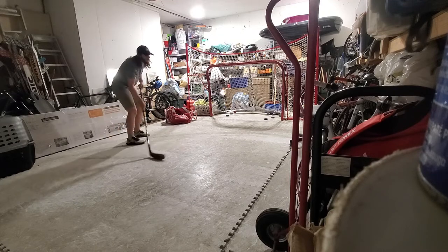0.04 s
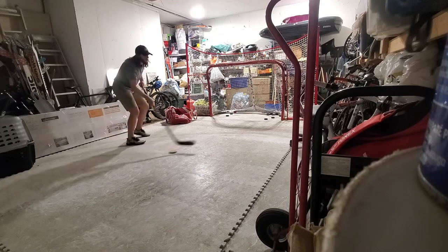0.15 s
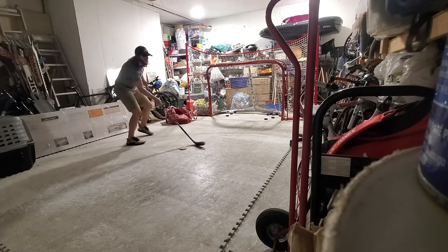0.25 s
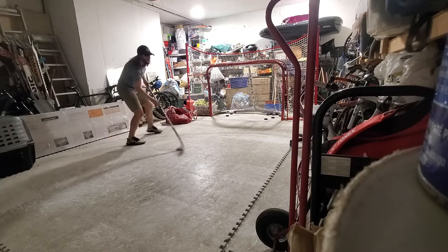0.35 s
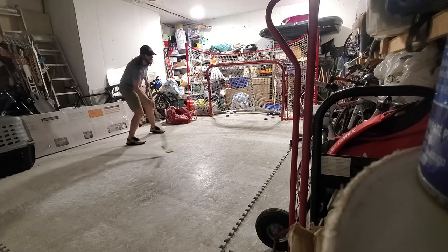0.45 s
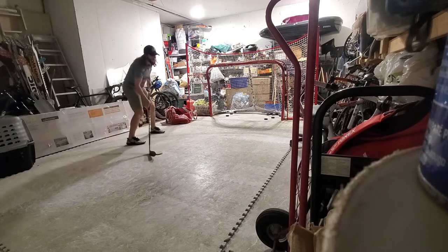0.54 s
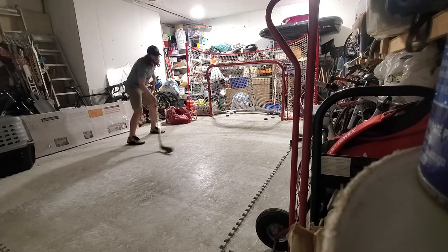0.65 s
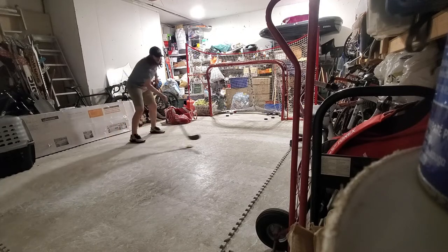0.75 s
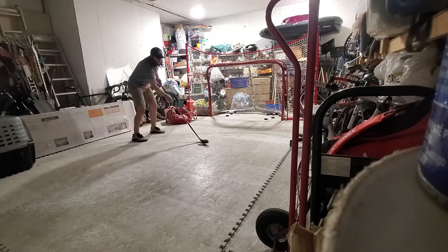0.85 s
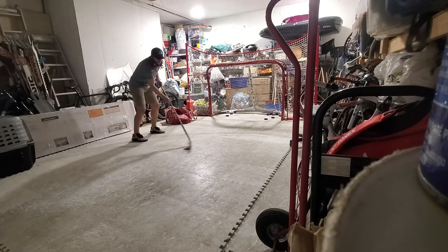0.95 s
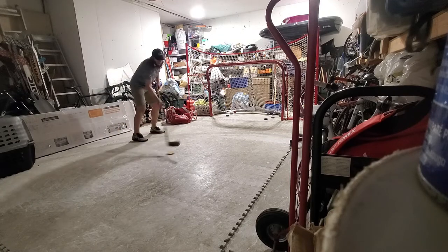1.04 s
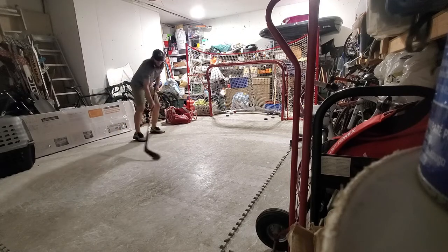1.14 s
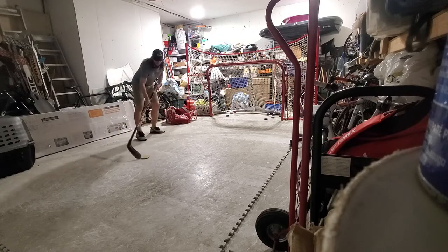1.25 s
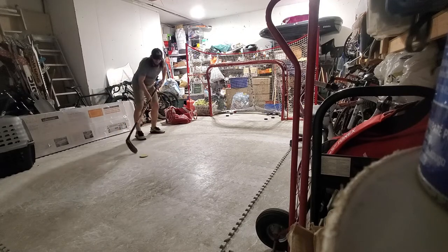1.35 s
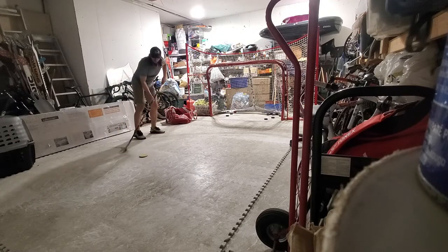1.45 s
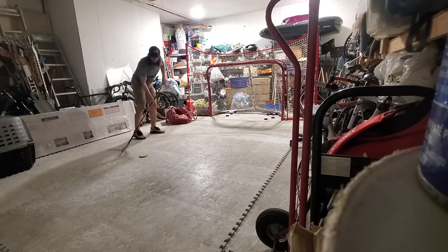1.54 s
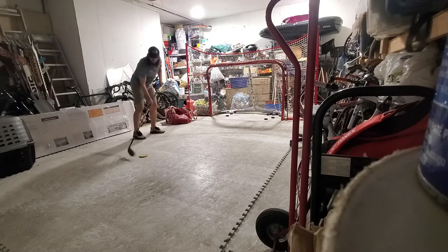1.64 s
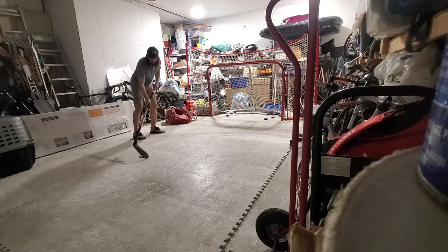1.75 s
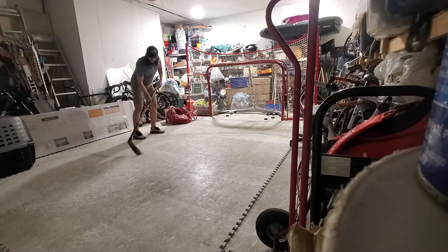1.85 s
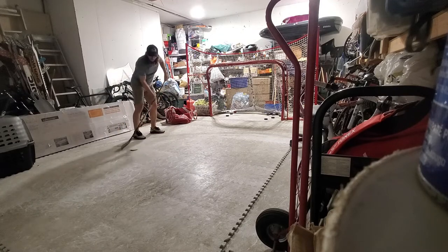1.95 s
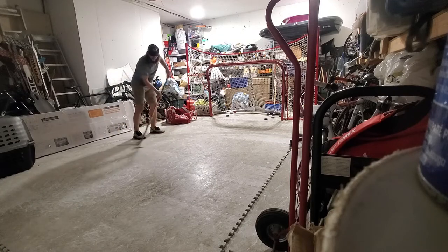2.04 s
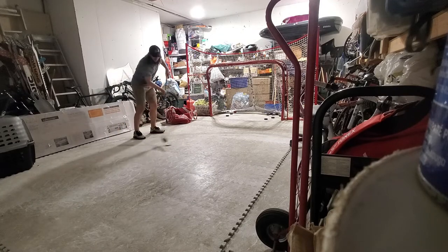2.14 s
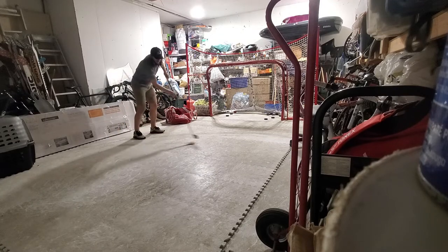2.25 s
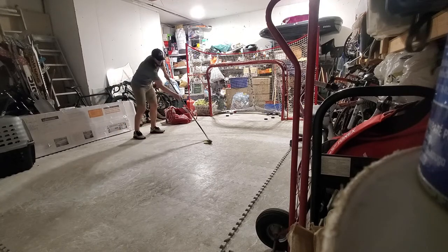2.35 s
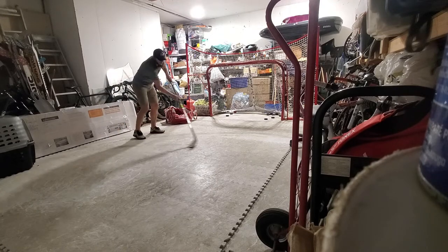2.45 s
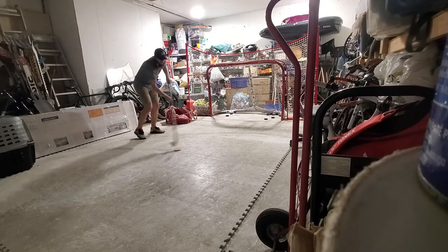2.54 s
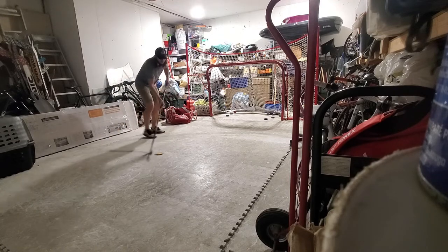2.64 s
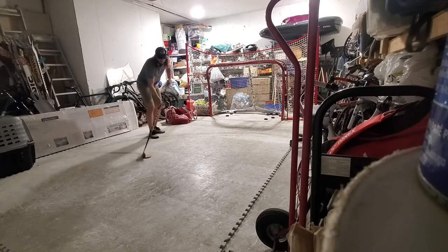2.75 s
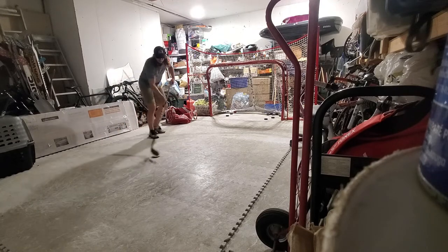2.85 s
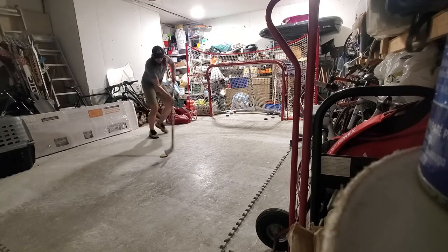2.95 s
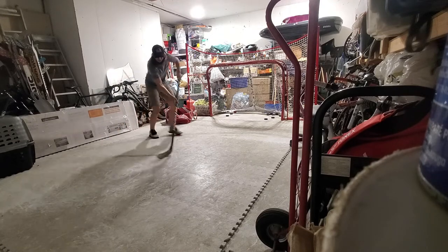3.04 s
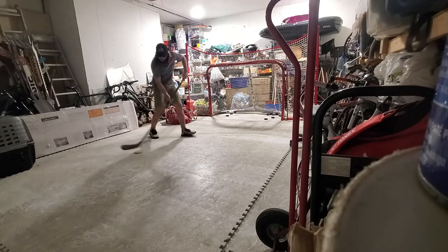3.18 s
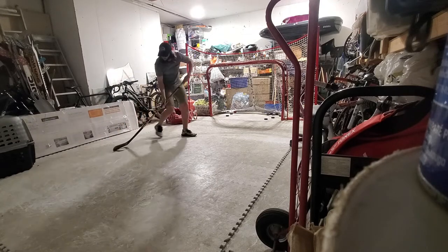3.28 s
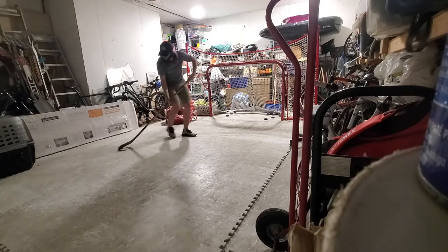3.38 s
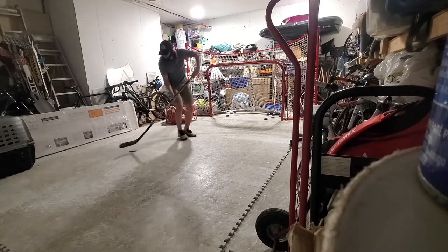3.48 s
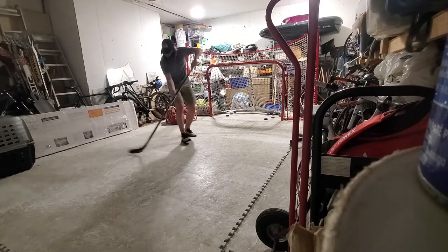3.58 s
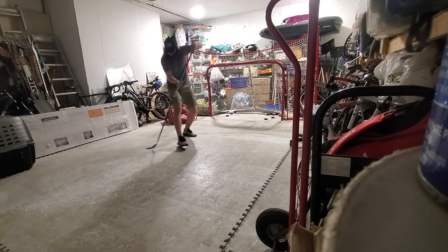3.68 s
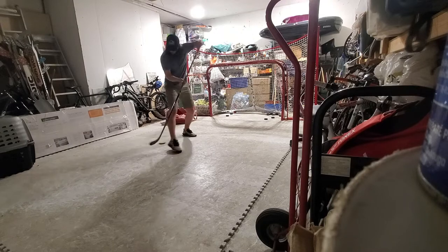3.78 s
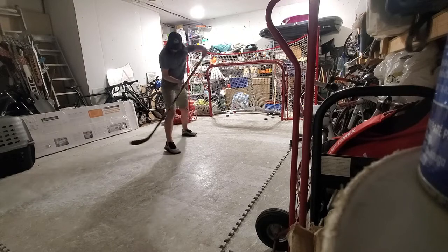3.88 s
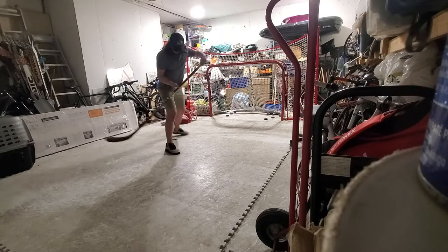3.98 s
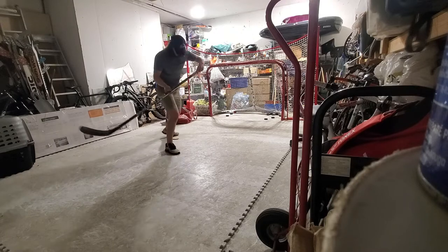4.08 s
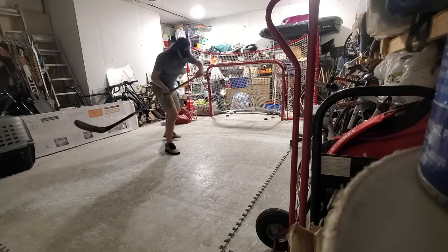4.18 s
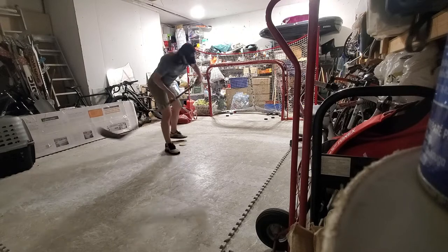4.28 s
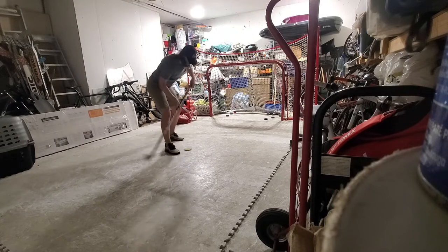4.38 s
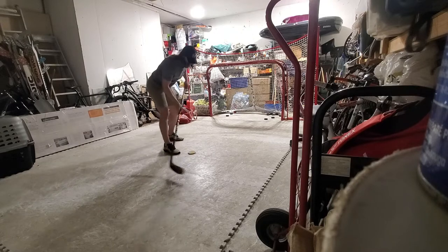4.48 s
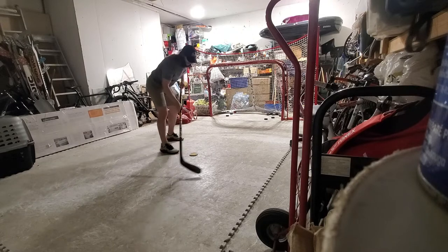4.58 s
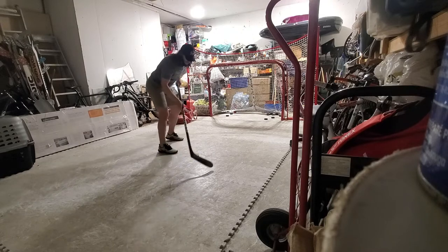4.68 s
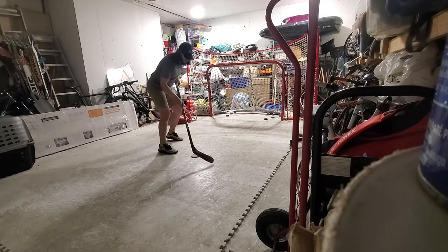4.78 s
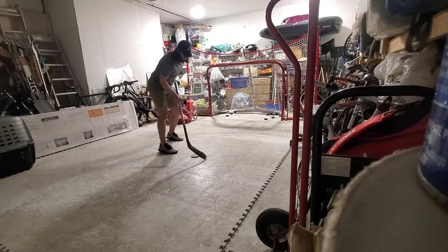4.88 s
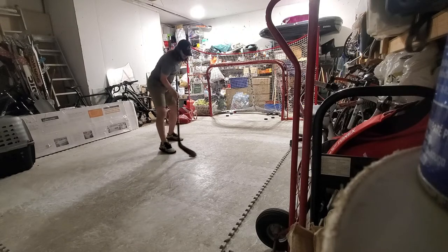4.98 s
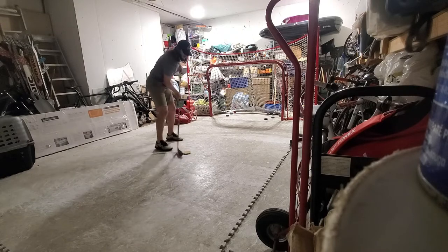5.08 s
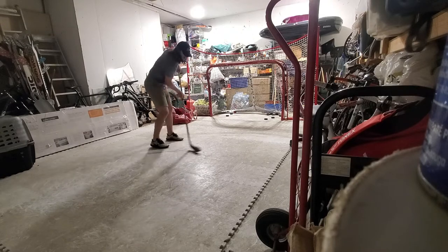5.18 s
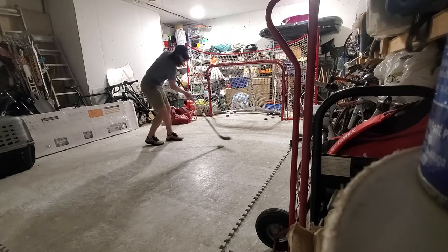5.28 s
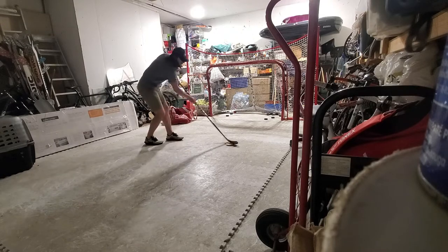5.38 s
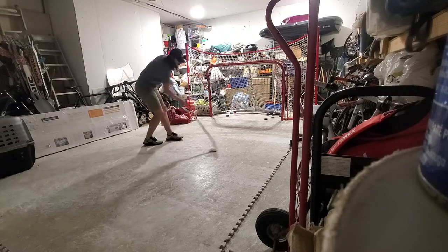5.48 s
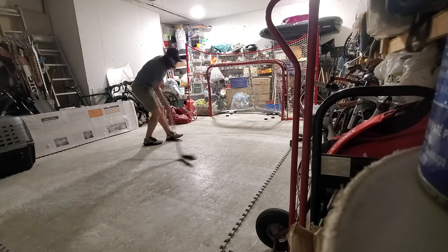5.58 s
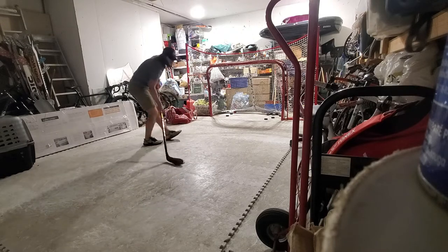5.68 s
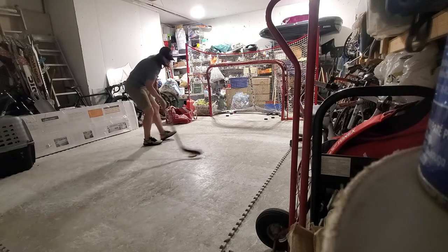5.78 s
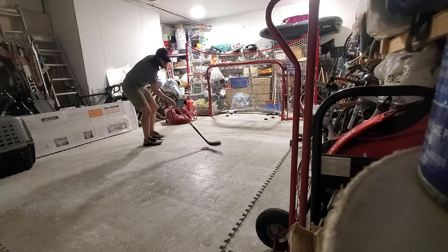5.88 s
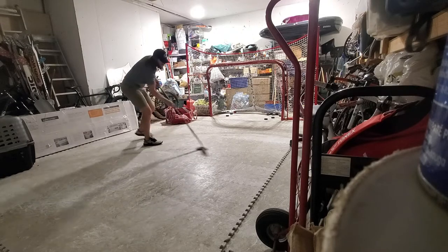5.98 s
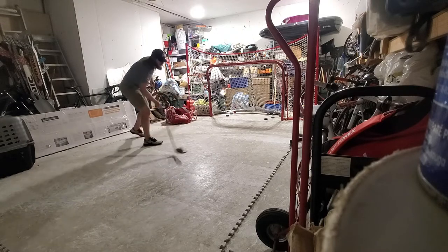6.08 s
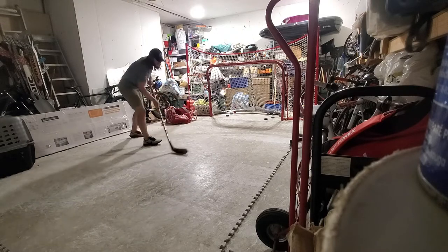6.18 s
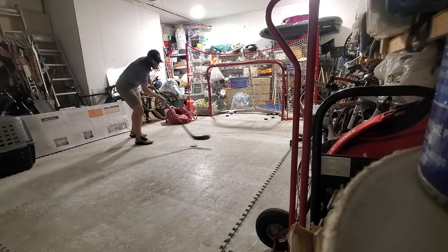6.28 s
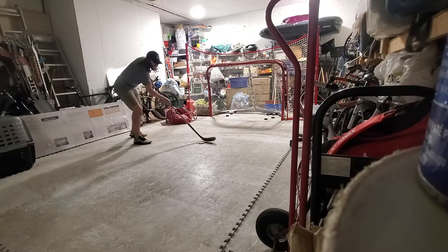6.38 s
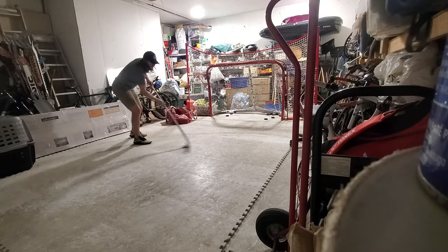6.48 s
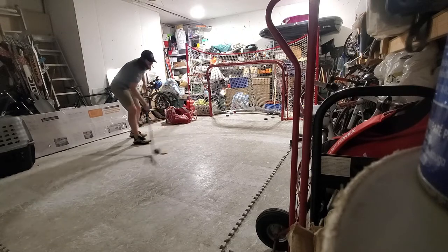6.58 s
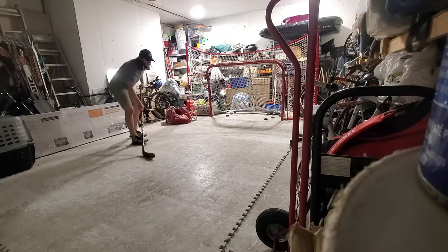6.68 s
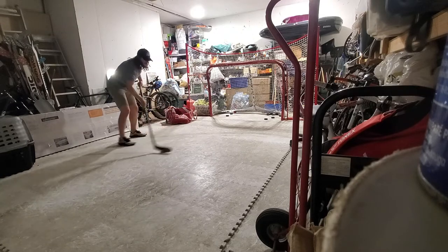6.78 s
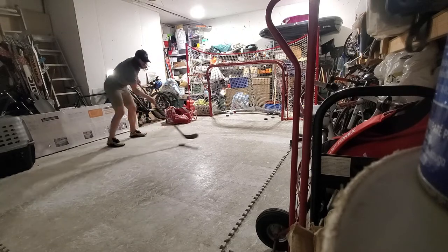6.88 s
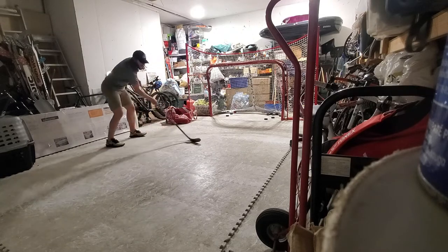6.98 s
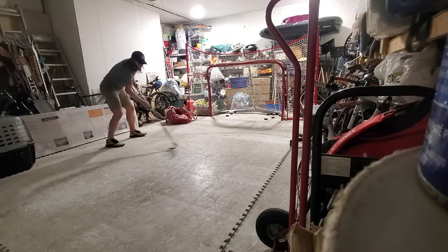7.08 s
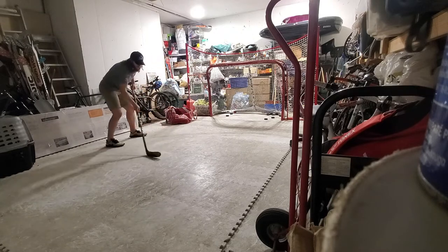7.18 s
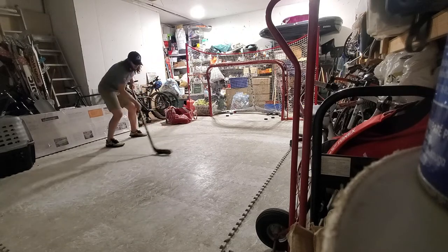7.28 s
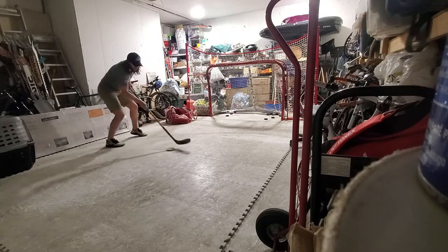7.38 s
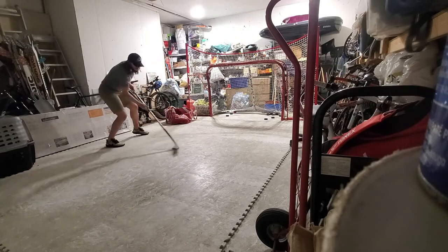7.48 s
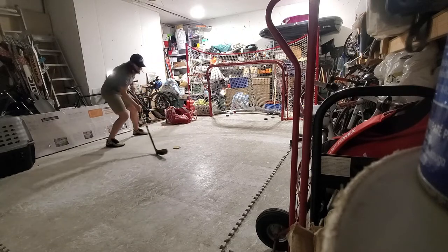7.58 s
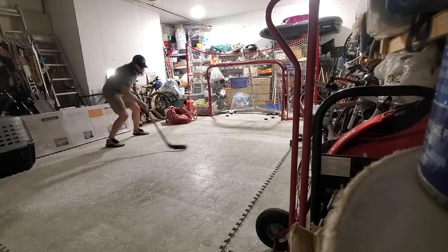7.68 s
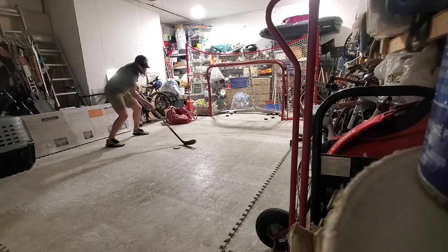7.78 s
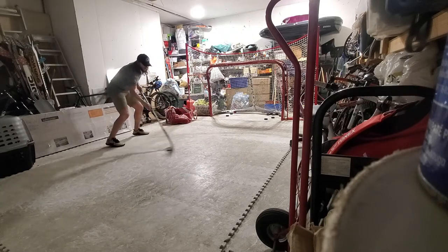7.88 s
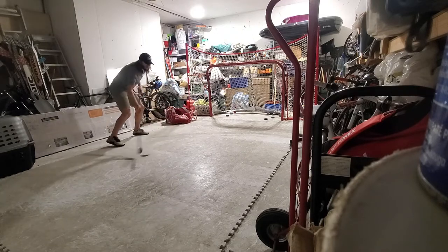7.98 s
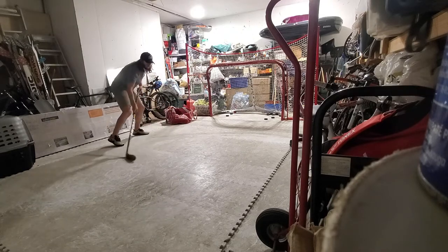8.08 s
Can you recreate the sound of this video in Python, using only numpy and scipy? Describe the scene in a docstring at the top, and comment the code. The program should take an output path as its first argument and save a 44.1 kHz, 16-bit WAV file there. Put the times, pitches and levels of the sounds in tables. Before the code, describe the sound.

A brief low scrape opens, then hard, dry clacks of a hockey stick blade on a puck at about 0.3, 0.6, 0.9 and 1.2 seconds, each with a crisp tick, short hollow blade ring and dull floor thud. From 1.2 to 2.3 gritty scraping dominates, with only a weak tap at 1.8. Knocks resume at 2.4, a duller one at 2.7, then 3.1, 3.4 and a strong double crack at 3.7. Around 4.1 to 4.7 it quiens to soft taps, light rubbing and two faint sole squeaks. A duller knock at 4.9 leads into sliding, then from 5.5 firm clacks come roughly every quarter second until just after 8. The small cluttered garage answers with a dense tail under half a second. The player is left of the stereo microphone, over faint bass-heavy noise.

```python
"""A low scrape first, then knock after knock: a hockey stick blade plays a puck on hard garage floor tiles.
Each knock cracks and ticks (band-passed impulses), rings the blade and thuds in the tiles (decaying sines).
Between knocks blade, puck and shoes scrape along as flickering filtered noise; a sole squeaks faintly twice.
The small cluttered garage answers with a dense short tail of sparse random taps.
The player stands left of a two-port microphone, which adds faint noise of its own."""
import sys
import numpy as np
from scipy import signal
from scipy.fft import rfft, irfft, next_fast_len
from scipy.io import wavfile
from scipy.ndimage import uniform_filter1d

SR = 44100
rng = np.random.default_rng(int(sys.argv[2]) if len(sys.argv) > 2 else 0)


def store_pcm(level_fs):
    """Save levels as 16-bit WAV."""
    pcm = np.round(np.clip(level_fs, -1, 1) * 32767).astype(np.int16)
    wavfile.write(sys.argv[1], SR, np.atleast_2d(pcm).T)


N = 358533

# knocks: mostly blade on puck, some touch-downs of the blade on the floor and dull thuds, perhaps footsteps;
# levels before the mix: [t/s, crack level/dB, blade ring level/dB, tile thud level/dB,
#  tick over crack/dB (held to 0 at most), blade tuning/factor (held to 3/4 to 4/3)]
KNOCKS = [(0.3454, -7.5, -14.5, -24.5, -3, 1.03), (0.5848, -13.5, -14, -17, -3, 1.13),
          (0.8938, -10.5, -13, -21.5, -5.5, 0.99), (1.1893, -9.5, -23.5, -27, -4, 1.1),
          (1.843, -27, -34, -35.5, -9, 1.04), (2.4198, -11, -14.5, -21, -5, 0.98),
          (2.7357, -25, -21, -24.5, -13, 1.07), (3.055, -16.5, -17.5, -21, -9, 0.77),
          (3.3783, -11.5, -19.5, -21, -6.5, 1.11), (3.6918, -6, -28, -22, -7, 0.93),
          (3.7111, -15, -24, -30, -9, 1.13), (4.271, -27, -46, -38, -18, 0.66),
          (4.4274, -26, -37, -37, -9, 0.66), (4.4462, -35, -46, -38, -11, 0.63),
          (4.870, -15.5, -26, -29.5, -30, 1.04), (5.465, -9, -18, -22, -27, 1.21),
          (5.6899, -8.5, -15, -16, 1, 0.96), (6.0057, -6.5, -14, -18.5, -2.5, 0.94),
          (6.0542, -49, -32, -38, -21, 1.03), (6.2038, -7.5, -15.5, -18.5, 2, 1.07),
          (6.4537, -7.5, -13.5, -17.5, -5.5, 1.02), (6.7027, -12.5, -17, -18.5, -2, 0.95),
          (7.0078, -10, -16, -19.5, -41, 0.98), (7.2282, -8.5, -14.5, -15.5, -41, 0.92),
          (7.5158, -9.5, -17, -18, -1, 1), (7.677, -12, -15, -17.5, -2.5, 1),
          (7.8764, -14, -14, -17.5, -1, 0.88), (8.1195, -6, -14, -21.5, -1.5, 1.03)]
LEAD = 16  # samples by which the direct sound reaches the left port first


def gain_of(db):
    """dB to gain."""
    return 10 ** (np.asarray(db) / 20)


def evened(x):
    """Scales to rms 1."""
    return x / np.sqrt(np.mean(x ** 2) + 1e-20)


def read(points, hz):
    """Reads a table on a log-frequency axis."""
    f, value = np.transpose(points)
    return np.interp(np.log(hz + 1), np.log(f + 1), value)


def coloured(x, points, power=1):
    """Filters by a table of f/Hz and level/dB; power scales the dB."""
    length = x.shape[-1]
    size = next_fast_len(length)
    gain = gain_of(power * read(points, np.fft.rfftfreq(size, 1 / SR)))
    return irfft(rfft(x, size) * gain, size)[..., :length]


def microphone_noise():
    """Faint steady noise of the microphone, independent at each port and strongest in the bass."""
    # noise colour: [f/Hz, level/dB]
    noise_colour = [(20, 13), (45, 20), (70, 14), (120, 6), (1500, -4), (3000, -8), (6700, -13),
                    (7400, -21), (16500, -18)]
    return gain_of(-70) * evened(coloured(rng.standard_normal((2, N)), noise_colour))


def tail():
    """Garage echoes: sparse taps of random sign die band by band, most alike at both ports in the bass."""
    # decay of the garage: [f/Hz, t60/s]
    decay = [(100, 0.41), (260, 0.28), (700, 0.3), (1840, 0.43), (4850, 0.47), (12800, 0.15)]
    # likeness of the tail at both ports: [f/Hz, likeness from -1 to 1]
    likeness = [(40, 0.5), (100, 0.74), (200, 1), (400, 0.5), (700, 0.59), (1400, 0.067), (3000, 0.017),
                (15000, 0.018)]
    # colour that walls and clutter give the echoes: [f/Hz, level/dB]
    wall_colour = [(100, 1.5), (600, -4.5), (2000, -1.5), (6000, -3.5), (14000, 4.5)]
    taps = np.zeros((2, 30000))
    at = np.arange(60, 29900, 16) + rng.integers(0, 16, (2, 1865))
    np.put_along_axis(taps, at, rng.choice([-1., 1.], at.shape), 1)
    hz, t, (left, right) = signal.stft(taps, SR, nperseg=512)
    same = np.clip(read(likeness, hz), -.99, .99)[:, None]
    right = same * left + np.sqrt(1 - same ** 2) * right
    level_db = read(wall_colour, hz)[:, None] - 60 * t / read(decay, hz)[:, None]
    wet = signal.istft(np.array([left, right]) * gain_of(level_db), SR, nperseg=512)[1]
    # echoes gather over the first milliseconds
    wet = wet * (1 - np.exp(-np.arange(wet.shape[1]) / SR / 0.0013))
    return wet / np.linalg.norm(wet[0])


def garage(x, count=6):
    """A lasting sound fades through several random sets of echoes in turn, so the room's wash stays even."""
    turn = 15 * np.arange(N) / SR  # 15 sets per second
    wet = np.zeros((2, N))
    for k in range(count):
        distance = (turn - k + count / 2) % count - count / 2
        share = np.cos(np.pi / 2 * np.clip(distance, -1, 1))
        wet += signal.fftconvolve((x * share)[None], tail(), axes=1)[:, :N]
    return wet


def squeaks():
    """A sole rubs briefly: a narrow tone made fuzzy by slow random changes of level."""
    # faint shoe squeaks, levels before the mix: [t/s, length/s, f/Hz, level/dB]
    sole_rubs = [(4.108, 0.024, 1624, -34), (4.206, 0.049, 1540, -39)]
    out = np.zeros(N)
    for s, length, hz, db in sole_rubs:
        t = np.arange(round(length * SR)) / SR
        fuzz = evened(1 + uniform_filter1d(rng.standard_normal(len(t)), 200) * 8)
        tone = np.sin(2 * np.pi * hz * t) * np.hanning(len(t))
        out[round(s * SR):][:len(t)] = gain_of(db) * fuzz * tone
    return out


def pressure():
    """Levels of hiss, rumble and fizz: every stroke rises, holds and falls; overlaps add in power."""
    # strokes of blade, puck or shoe along the floor, times at least 2 ms, levels before the mix:
    # [full pressure t/s, rise/s, hold/s, fall/s, hiss level/dB, rumble level/dB, fizz level/dB]
    strokes = [(0.0, .01, 0.019, 0.052, -34.5, -19.5, -65), (0.18, 0.27, 0.0033, 0.067, -34.5, -29.5, -51),
               (0.44, 0.071, 0.014, 0.028, -35, -19, -60), (0.80, 0.16, 0.083, 0.028, -36.5, -37.5, -45),
               (1.04, .03, 0.033, 0.27, -49, -45, -55), (1.21, .01, 0.031, 0.14, -32, -22, -40),
               (1.37, 0.23, 0.038, 0.15, -29, -23.5, -53), (1.5, 0.064, .065, 0.036, -43, -28.5, -48),
               (1.86, 0.015, 0.09, 0.09, -34, -27.5, -56), (1.94, 0.12, 0.078, 0.14, -28.5, -24, -46),
               (2.065, 0.04, 0.0084, 0.04, -42, -19, -34), (2.14, 0.11, 0.01, 0.088, -24, -18, -38),
               (2.3, 0.14, .09, .02, -50, -45.5, -50.5), (2.63, .05, 0.12, .03, -51, -49, -52),
               (2.89, .04, 0.15, .02, -61, -47, -59), (3.11, .06, 0.013, 0.14, -24, -26.5, -35),
               (3.29, .04, 0.097, .02, -53, -43, -51), (3.5, 0.035, 0.033, 0.21, -46.5, -44.5, -52),
               (3.725, 0.025, 0.0067, 0.066, -24.5, -22.5, -48), (3.9, .06, 0.17, .05, -44, -45.5, -51),
               (4.11, 0.15, 0.016, 0.14, -43, -47.5, -38.5), (4.262, 0.13, 0.05, 0.1, -35.5, -40, -38.5),
               (4.665, 0.16, 0.0074, 0.076, -41, -49, -44), (4.89, 0.012, 0.011, 0.18, -26, -26, -42),
               (4.97, .06, 0.1, 0.26, -27.5, -24, -49), (5.215, 0.12, 0.014, 0.12, -27, -23.5, -45),
               (5.31, 0.1, 0.081, 0.077, -35, -44, -45), (5.85, 0.17, 0.0065, 0.07, -33.5, -41, -49),
               (6.38, 0.18, 0.011, 0.034, -28, -48, -34.5), (6.56, .05, 0.035, .06, -42, -48, -54),
               (6.66, .03, 0.017, 0.018, -43, -56, -46), (6.77, 0.031, 0.067, 0.17, -29, -52, -40),
               (6.95, .04, .05, .02, -50, -40, -48), (7.15, .05, 0.081, 0.023, -56, -45, -63),
               (7.62, .04, 0.063, .02, -54, -36, -56)]
    # after every knock a brief chatter, then a glide that slows:
    # [delay/s, rise/s, hold/s, fall/s, hiss over blade ring/dB, rumble over tile thud/dB, fizz over crack/dB]
    after_knock = [(0.029, .02, 0.0026, 0.043, -14.5, 4, -24.5),
                   (0.051, 0.047, 0.0091, 0.16, -22.5, -7.5, -32.5)]
    rise_db, fall_db = 25, 20  # level covered in the rise time and in the fall time
    lift = 1.5  # power of time: the fall steepens as the contact lifts off

    rows = list(strokes)
    for s, crack_db, ring_db, thud_db, *_ in KNOCKS:
        for delay, *times, hiss_db, rumble_db, fizz_db in after_knock:
            rows.append((s + delay, *times, ring_db + hiss_db, thud_db + rumble_db, crack_db + fizz_db))

    t, power = np.arange(N) / SR, np.zeros((3, N))
    for s, rise, hold, fall, *db in rows:
        rise, hold, fall = np.maximum([rise, hold, fall], 1 / 500)
        # never before the last knock ahead of full pressure
        start = max([s - rise, 0] + [knock[0] for knock in KNOCKS if knock[0] < s])
        on = slice(round(start * SR), round((s + hold + 3 * fall) * SR))
        rise_shape = rise_db * np.minimum(t[on] - s, 0) / rise
        fall_shape = fall_db * (np.maximum(t[on] - s - hold, 0) / fall) ** lift
        power[:, on] += gain_of(np.array(db)[:, None] + rise_shape - fall_shape) ** 2
    return np.sqrt(power)


def scraping():
    """Grit under the stroke: dense uneven slips make hiss and fizz and shake the tiles into rumble."""
    # colours of the grit noise: [f/Hz, level/dB]
    hiss_colour = [(350, -50), (700, -1.5), (1100, 1.5), (1600, 0), (2400, -0.5), (3600, -1), (5500, -9),
                   (8500, -15), (11000, -24.5)]
    rumble_colour = [(40, -17), (90, -24.5), (150, -10), (250, -1), (400, -0.5), (750, 0), (1200, -10),
                     (2000, -20), (3500, -44.5)]
    fizz_colour = [(4000, 4), (7000, 11.5), (9000, 2.5), (12000, -0.5), (16500, 7.5)]
    *grit, grain = rng.standard_normal((4, N))
    # pressure flickers over the tile grain
    slips = gain_of(3.97 * evened(uniform_filter1d(grain, 150)))
    out = np.zeros(N)
    for level, noise, colour in zip(pressure(), grit, (hiss_colour, rumble_colour, fizz_colour)):
        out += level * evened(coloured(noise * slips, colour))
    return out


def click(lo_hz, hi_hz):
    """A hard contact: one impulse through a broad band, peak 1."""
    band = signal.butter(2, [lo_hz, hi_hz], "band", fs=SR, output="sos")
    sound = signal.sosfilt(band, signal.unit_impulse(4000))
    return sound / np.abs(sound).max()


def ring(modes, luck, spread_db, tuning=1, tilt_db=0):
    """One knock on decaying modes: where it lands sets how strongly each speaks and detunes it."""
    hz, db, t60 = np.transpose(modes)[:, :, None]
    t = np.arange(4000) / SR
    strength_luck, tuning_luck = luck[:2 * len(modes)].reshape(2, -1, 1)
    sense = (-1) ** np.arange(len(modes))[:, None]  # neighbours start in opposite sense
    hz = hz * tuning * (1 + .025 * tuning_luck)
    level_db = db + tilt_db * np.log2(hz / hz[0]) + spread_db * strength_luck
    sound = (sense * gain_of(level_db - 60 * t / t60) * np.sin(2 * np.pi * hz * t)).sum(0)
    return sound / np.sqrt(np.mean(sound[:400] ** 2))  # rms 1 over the onset


def knocks():
    """Hard crack, bright tick, blade ring and tile thud; each contact has its own place and echoes."""
    # modes before tuning and chance: [f/Hz, level/dB, t60/s]
    blade_modes = [(462, -2, 0.022), (628, -4, 0.065), (716, -2.5, 0.038), (835, 5, 0.011),
                   (1188, 1, 0.018), (1273, 2.5, 0.0067), (1820, -6.5, 0.0094), (2005, -12.5, 0.021),
                   (3020, 1, 0.001)]
    tile_modes = [(143.6, -14.5, 0.015), (191, -35.5, 0.005), (279, -7, 0.0053), (335.2, 9.5, 0.029),
                  (370, 5, 0.034), (410, -23, 0.012)]
    # echoes off the nearest clutter, ceiling and walls, delays before chance: [delay/s, level/dB]
    near_echoes = [(.0015, -1.5), (.0045, -7.5), (.0085, -16), (0.014, -19.5), (.018, -4)]
    direct, wet = np.zeros(N + 4000), np.zeros((2, N + 40000))
    crack, tick = click(lo_hz=1210, hi_hz=5920), click(lo_hz=9300, hi_hz=18700)
    for s, crack_db, ring_db, thud_db, tick_db, tuning in KNOCKS:
        luck = rng.standard_normal(60)
        hard = gain_of(crack_db) * (crack + gain_of(min(tick_db, 0)) * tick)
        # dB per octave: a knock with little crack wakes fewer high modes
        tilt_db = np.clip(0.2 * (crack_db - ring_db - 4.0), -6, 3)
        tuning = np.clip(tuning, 3 / 4, 4 / 3)
        blade = gain_of(ring_db) * ring(blade_modes, luck, spread_db=1.8, tuning=tuning, tilt_db=tilt_db)
        thud = gain_of(thud_db) * ring(tile_modes, luck[20:], spread_db=1.2)
        sound = -(blade + thud) - hard

        early = np.zeros(4000)
        shifts = 1 + luck[40:] / 10  # path lengths change with the spot on the floor
        for (delay, db), shift in zip(near_echoes, shifts):
            early += gain_of(db) * np.roll(sound, round(delay * shift * SR))
        echoes = signal.fftconvolve(sound[None], tail(), axes=1)
        at = round(s * SR)
        direct[at:at + 4000] += sound + early
        wet[:, at:at + echoes.shape[1]] += echoes
    return direct[:N], wet[:, :N]


def scene():
    """Direct sound, louder and earlier at the left port, and the garage tail."""
    hits, echoes = knocks()
    rub = scraping() + squeaks()
    direct = gain_of(1.5) * hits + gain_of(-3.0) * rub
    direct = np.array([gain_of(-0.5) * direct, gain_of(-10.0) * np.roll(direct, LEAD)])
    wet = gain_of(10.0) * echoes + garage(gain_of(-0.5) * rub)
    # most walls in play stand to the left too
    wet = np.array([wet[0], np.roll(wet[1], LEAD // 2)])
    return direct + wet


def record(dry):
    """Two-port microphone: shading, colour, bass cut, own noise, soft overload, then the band limit."""
    # the body around the ports shades the right one: [f/Hz, left over right/dB]
    port_shade = [(60, -9), (180, 3.5), (550, -1), (1650, 1.5), (4970, 2), (15000, 6.5)]
    # microphone colour: [f/Hz, level/dB]
    mic_colour = [(120, -2), (6800, 0), (7800, -5.5), (11000, 4), (15000, -0.5)]
    # half of the shading goes to each port
    ports = np.array([coloured(dry[0], port_shade, .5), coloured(dry[1], port_shade, -.5)])
    ports = coloured(ports, mic_colour)
    ports = signal.sosfilt(signal.butter(3, 85, "high", fs=SR, output="sos"), ports)
    ports = ports + microphone_noise()
    ports = .99 * np.tanh(ports / .99)
    band_limit = signal.firwin(511, 15900, window=("kaiser", 9), fs=SR)  # low-pass, edge in Hz
    return signal.oaconvolve(ports, band_limit[None], "same", axes=1)


dry = scene()
out = record(dry)
store_pcm(out)
```